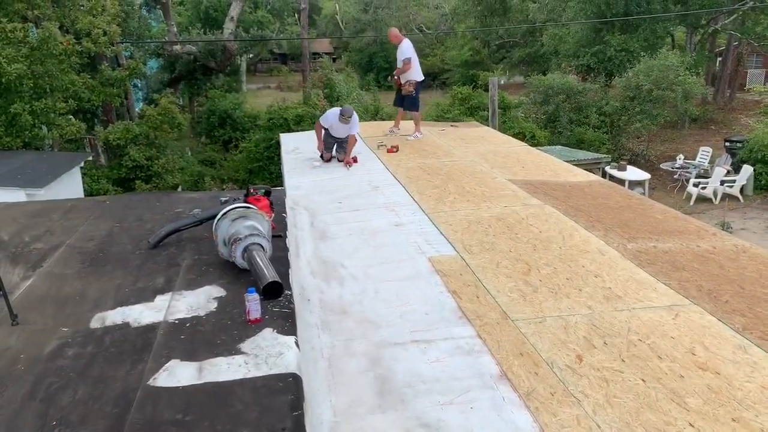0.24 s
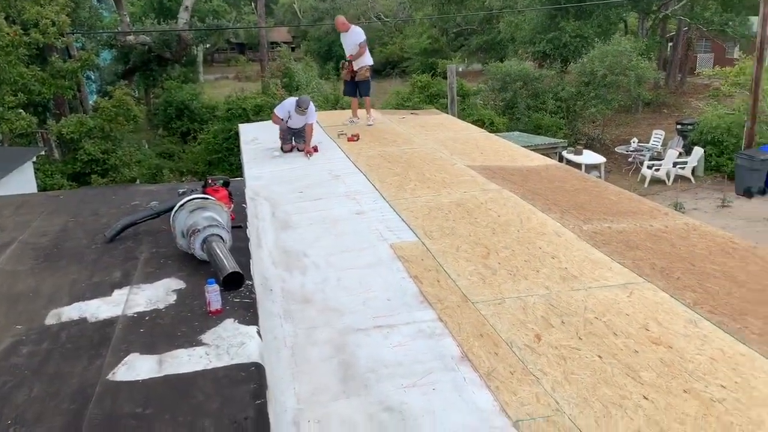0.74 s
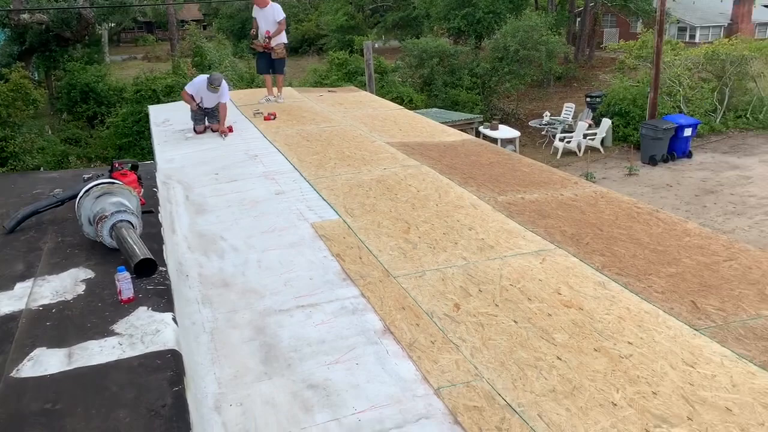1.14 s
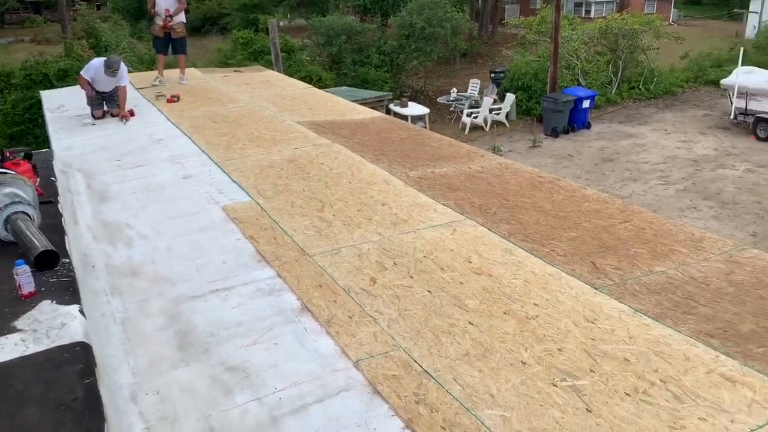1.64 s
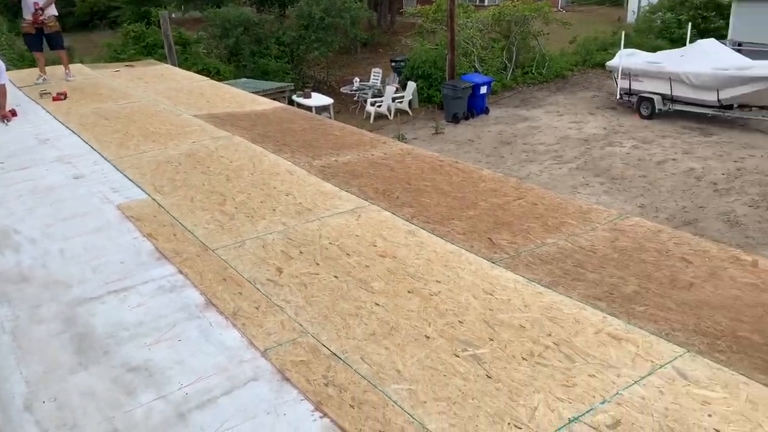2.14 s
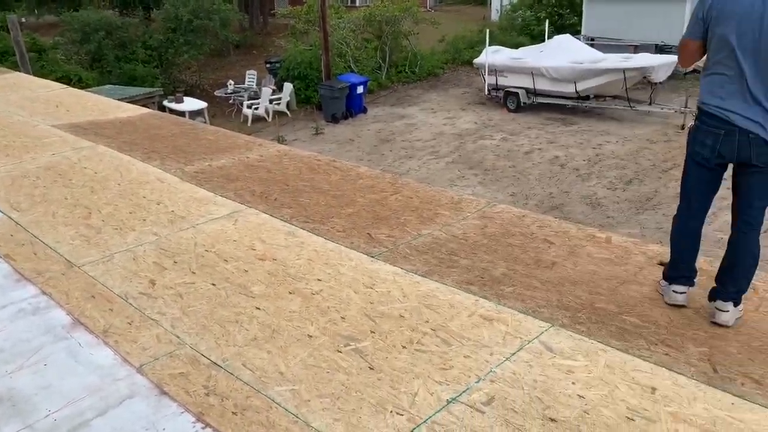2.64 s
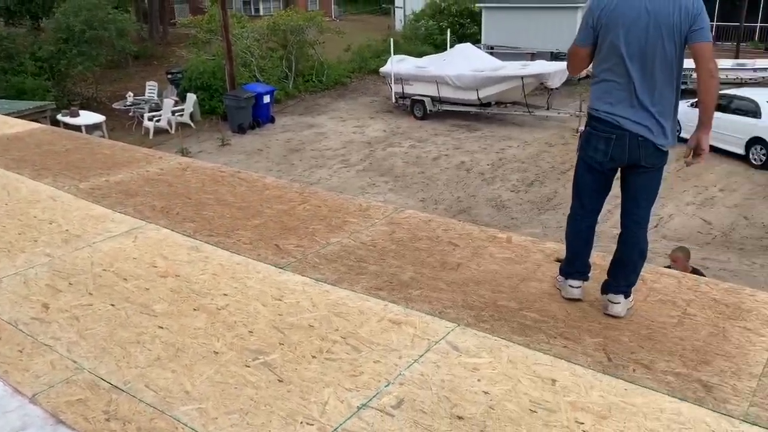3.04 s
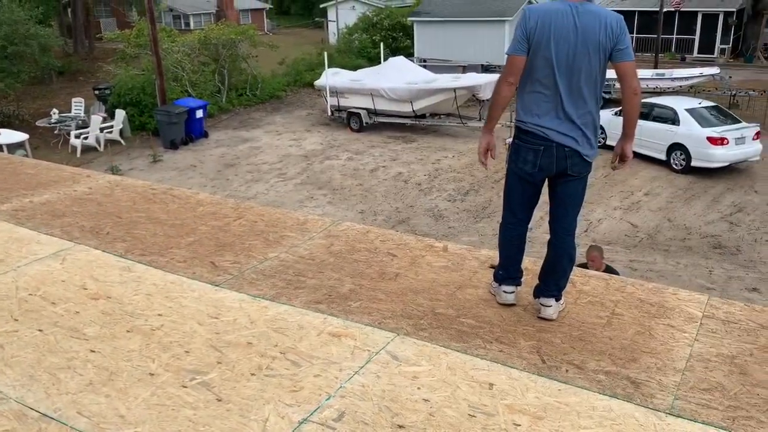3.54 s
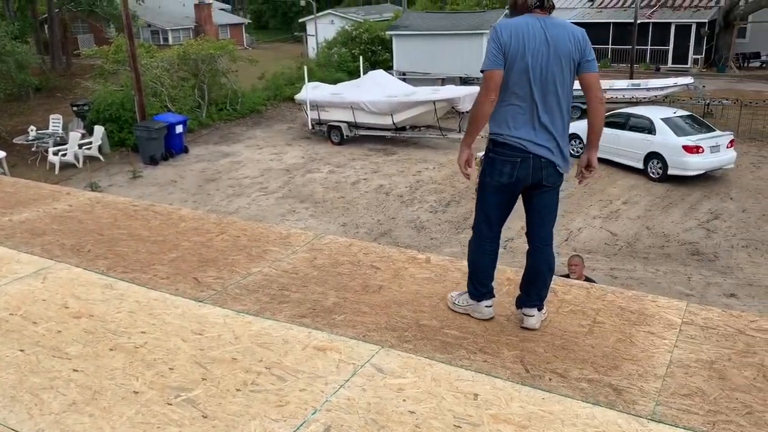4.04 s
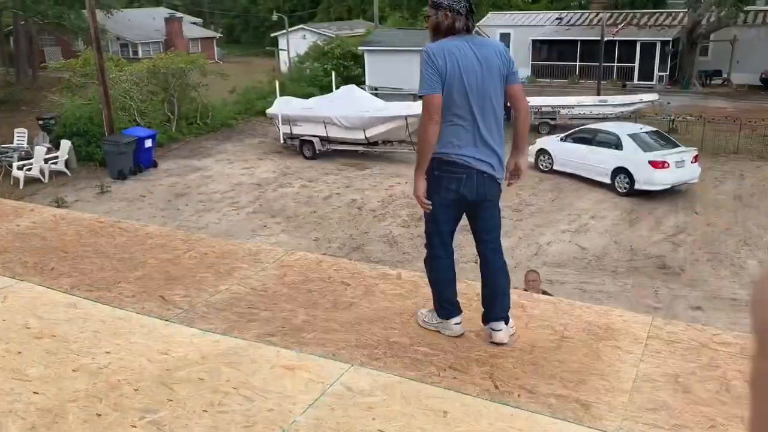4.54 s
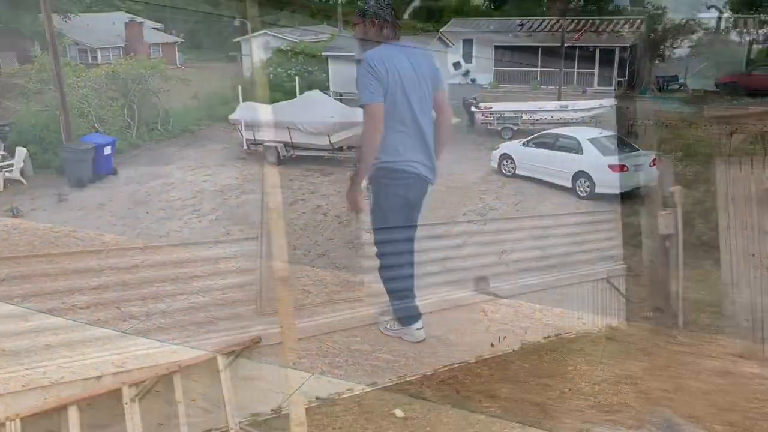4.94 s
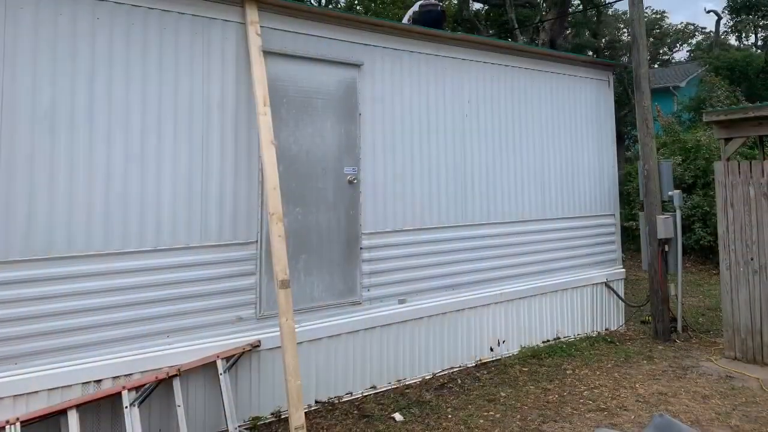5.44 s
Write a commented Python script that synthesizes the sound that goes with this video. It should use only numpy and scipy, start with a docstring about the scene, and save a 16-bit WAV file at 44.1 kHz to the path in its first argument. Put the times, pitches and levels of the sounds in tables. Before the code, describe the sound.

Hard hammer blows crack and thud on a hollow plywood roof deck, first one rhythm, then two, among footsteps, before fading out.

```python
"""Hammering on a roof deck

After one soft, low footfall, hard blows land on wooden roof sheathing in two steady, overlapping rhythms, as of
two people hammering. Each blow is a noise-burst crack through the air, a resonant bending wave whose bass arrives
last, then the ring of the hollow roof. Feet thump and scuff (shaped bursts), boards creak (rough bursts through a
resonance), a sleeve rustles (grainy noise), the yard echoes (decaying noise and slaps), and two faint chirps sound.
Low rumble, breeze and far insects are coloured noise, and all fades out at the end."""
import sys
import numpy as np
from scipy import signal
from scipy.fft import rfft, irfft, next_fast_len
from scipy.io import wavfile
from scipy.ndimage import uniform_filter1d, map_coordinates

SR = 44100
rng = np.random.default_rng(int(sys.argv[2]) if len(sys.argv) > 2 else 0)


def unload_audio(sound):
    """Save the sound as a 16-bit wav file, at the path given as the first command line argument."""
    columns = np.transpose(np.atleast_2d(sound))
    # keep every value between -1 and 1, then stretch to whole-number steps
    steps = np.round(np.clip(columns, -1, 1) * 32767)
    wavfile.write(sys.argv[1], SR, steps.astype(np.int16))


N = 251408

# single sounds are built as spectra on this grid; all source levels stand ahead of the final level curve
SIZE = 32768  # samples
HZ = np.fft.rfftfreq(SIZE, 1 / SR)
AGE = np.arange(SIZE) / SR  # seconds

# a harder contact lifts the treble: (frequency [Hz], share of the hardness [ratio])
HARDNESS_TILT = [(200, 0.23), (900, 0.76), (2300, 0.97)]


def amp(db):
    """Decibels to gain."""
    return 10 ** (np.asarray(db) / 20)


def unit(x):
    """Scaled to rms 1."""
    return x / np.sqrt(np.mean(x ** 2) + 1e-20)


def along(points, hz):
    """Curve through (frequency, value) points on a log frequency axis."""
    f, v = np.transpose(points)
    return np.interp(np.log(hz + 1), np.log(f + 1), v)


def curves(rows):
    """One value per sample for each column after the time."""
    s, *cols = np.transpose(rows)
    return [np.interp(np.arange(N) / SR, s, c) for c in cols]


def wobble(rate):
    """A smooth random curve, rate knots a second."""
    return map_coordinates(rng.standard_normal(int(N * rate / SR) + 4), [np.arange(N) * rate / SR])


def filtered(x, response):
    """x shaped by a response given as a function of frequency."""
    m = next_fast_len(N + SR // 2)
    return irfft(rfft(x, m) * response(np.fft.rfftfreq(m, 1 / SR)), m)[..., :N]


def noise(spectrum, channels):
    """Coloured noise of rms 1."""
    return unit(filtered(rng.standard_normal((channels, N)), lambda hz: amp(along(spectrum, hz))))


def below(corner_hz, order=4):
    """Share of the power that lies under a crossover."""
    return 1 / (1 + (HZ / corner_hz) ** order)


def later(seconds):
    """A pure delay."""
    return np.exp(-2j * np.pi * HZ * seconds)


def mode(centre_hz, width):
    """A damped resonance of gain 1; its width is a share of its frequency."""
    damping = 1j * HZ * centre_hz * width
    return damping / (centre_hz ** 2 - HZ ** 2 + damping)


def bending(travel, rafter_s=0):
    """Bending waves speed up as the root of frequency, so bass comes last; rafters hold it back further."""
    deck_turns = 2 * travel * np.sqrt(200 * HZ)
    rafter_turns = rafter_s * 100 ** 2 / np.maximum(HZ, 35)
    return -1j * np.exp(2j * np.pi * (rafter_turns - deck_turns))


def burst(rise, t60):
    """Spectrum of a noise burst of energy 1."""
    x = rng.standard_normal(SIZE) * (1 - np.exp(-AGE / rise)) * amp(-60 * AGE / t60)
    return rfft(x / np.linalg.norm(x))


def swell(rise_s, fall_s):
    """Spectrum of a noise burst of energy 1 that builds up to time zero and dies away."""
    t = (AGE + .02) % (SIZE / SR) - .02  # the last 20 ms of the grid stand for negative time
    x = rng.standard_normal(SIZE) * np.exp(-np.logaddexp(-t / rise_s, t / fall_s))
    return rfft(x / np.linalg.norm(x))


def tail(t60s, rise, patchy_db):
    """Spectrum of a diffuse, patchy tail of energy 1; each frequency dies at its own speed."""
    hz, t, z = signal.stft(rng.standard_normal(SIZE), SR, nperseg=256)
    t60 = along(t60s, hz)[:, None]
    patches = uniform_filter1d(rng.standard_normal(z.shape), size=3, axis=0)
    patches = unit(uniform_filter1d(patches, size=5, axis=1))
    decay = amp(patchy_db * patches - 60 * t / t60) / np.sqrt(t60)
    x = signal.istft(z * decay, SR, nperseg=256)[1][:SIZE]
    x = x * (1 - np.exp(-(AGE / rise) ** 2))
    return rfft(x / np.linalg.norm(x))


def coarse(spectrum, rough_db, clump_s):
    """The same sound broken into short clumps of random strength, at equal energy."""
    x = irfft(spectrum)
    knots = rng.standard_normal(SIZE // 8)
    lumpy = x * amp(rough_db * map_coordinates(knots, [AGE / clump_s], order=1, mode="wrap"))
    return rfft(lumpy * np.linalg.norm(x) / np.linalg.norm(lumpy))


def peaking(spectrum, db):
    """A sound scaled to a peak level."""
    return amp(db) * spectrum / np.abs(irfft(spectrum)).max()


def ports(s, knock_db=1.5, crack_db=-2.5, bass_hz=255, treble_hz=463):
    """Left and right responses: the right side hears the sound later, by a lag that drifts with time."""
    # (time [s], treble lag of the right side [s], bass lag of the right side [s])
    lags = [(.85, .00021, 0), (2.6, 0.000361, 0), (3.899, 0.00042, 0.00034), (4.23, 0.00039, 0.0028),
            (4.54, .00042, 0.0027), (4.9, 0.00043, 0.0029)]
    times, treble_lags, bass_lags = np.transpose(lags)
    thud = below(bass_hz, order=8) * (1 - below(125, order=6))
    lag = thud * np.interp(s, times, bass_lags) + (1 - below(treble_hz)) * np.interp(s, times, treble_lags)
    # positive decibels lean to the left
    lean = along([(250, 0.0043), (650, knock_db), (1200, 0.0034), (4000, crack_db), (10000, 0.00068)], HZ)
    side = np.array([[1], [-1]])
    return amp(side * lean) * np.exp(1j * np.pi * HZ * lag * side)


def add(track, s, spectrum):
    """Mixes a sound, given as a spectrum, in at time s, with room for what comes just before it."""
    lead = min(1024, max(round(s * SR), 0))
    x = np.roll(irfft(spectrum), lead, axis=-1)
    x = x * np.minimum((np.arange(SIZE) + 1) / (lead / 2 + 1), 1)
    start = max(round(s * SR) - lead, 0)
    track[:, start:start + SIZE] += x[..., :N - start]


def blows():
    """Each contact force drives crack, board knock, bending wave, roof ring and yard echo together."""
    # the first, soft low thud is a footfall, played with the slow hammer's colour; the rest are hammer blows
    # (time [s], whose colour and rhythm, strength [dB], hardness of the contact [dB], metallic tick [dB],
    #  woody knock [dB], pitch of the struck sheet [Hz], travel time through the deck at 200 Hz [s],
    #  extra delay at 100 Hz from crossing rafters [s], echo in the yard [dB],
    #  pitch of the rafter bay [Hz], its knock [dB], ring of the nail in the wood [Hz], its level [dB])
    impacts = [(0.298, "slow", -23.5, -19.5, 3, 7, 724, 0.012, 0.0033, -9.5, 470, 0.5, 1430, -16),
               (0.846, "slow", -16.5, 0, 0, 11, 857, 0.013, 0.0011, -13, 190, -1, 1400, -1),
               (1.274, "slow", -14.5, 0, 1, 3.5, 878, 0.014, 0.0012, -15.5, 480, 1.5, 1420, -21),
               (1.691, "slow", -16, 2.5, -1, 5, 837, 0.012, 0.0012, -19, 450, -15, 1450, -7),
               (2.153, "slow", -18, 0, 12, 9.5, 914, 0.015, .001, -15.5, 280, -7, 3900, 0),
               (2.582, "slow", -15.5, 0.5, 7, 2.5, 791, 0.014, 0.0011, -18.5, 245, -10, 3820, -1.5),
               (3.041, "slow", -18.5, -3, 2, 7.5, 797, 0.014, 0.00071, -15, 380, 9, 1160, -1),
               (3.223, "quick", -20, 6, 3.5, -5, 772, 0.01, 0.0046, -10.5, 290, -3.5, 1930, -18),
               (3.489, "slow", -17, -0.5, -5.5, 2, 890, 0.012, .001, -18.5, 420, 3.5, 2190, -9),
               (3.556, "quick", -19, 2.5, -2, -2.5, 765, 0.0091, 0.0063, -11.5, 280, -1, 2530, -2.5),
               (3.874, "quick", -19, -4, -10.5, 2.5, 843, 0.01, 0.0088, -14.5, 300, -4.5, 2920, -3),
               (4.041, "slow", -20, 4.5, -3, 0.5, 1067, .012, 0.0016, -15.5, 430, -3, 2260, -5),
               (4.225, "quick", -19, -9.5, -1, 7, 766, 0.0069, .015, -14, 275, 0, 2270, -7),
               (4.541, "quick", -21.5, -2.5, -1, 2, 844, 0.0061, 0.022, -16.5, 320, 1, 2550, -2.5),
               (4.872, "quick", -19.5, -2.5, -2, 0.5, 725, 0.0042, 0.024, -12.5, 315, 2.5, 1936, -6.5),
               (4.923, "slow", -21, 19, -15, -10, 960, 0.0071, 0.0095, -24, 434, 2, 2240, 3.5),
               (5.209, "quick", -20, -6, -3.5, -3, 810, 0.0051, 0.015, -16.5, 355, 8.5, 1619, -5),
               (5.357, "slow", -12.5, 10.5, -4.5, -7, 920, .009, 0.011, -22, 350, -13, 2197, -1)]
    # overall colour of a blow as heard, before the pitch shift: (frequency [Hz], level [dB])
    blow_colour = [(30, 35), (60, 40.5), (110, 49), (170, 58), (270, 51.5), (450, 44.5), (750, 42),
                   (1200, 45), (2300, 37), (4500, 39), (7000, 43.5), (8700, 27.5), (10000, 41),
                   (12000, 38.5), (13400, 27.5), (15000, 33.5), (16200, 27)]
    # steel on the nail head lifts the very top: (frequency [Hz], share of the tick [ratio])
    tick_tilt = [(2500, 0.0034), (5500, 0.32), (11000, 0.88)]
    out = np.zeros((2, N))
    for (s, hammer, db, hardness_db, tick_db, knock_db, sheet_hz, travel, rafter_s, echo_db,
         bay_hz, bay_db, nail_hz, nail_db) in impacts:
        # the farther the wave runs through the deck, the lower its thud
        thud_hz = 183.6 * (0.012 / travel) ** 0.25
        shift = (thud_hz / 200) ** below(550)
        force = amp(db + contact(hammer, knock_db, hardness_db) + along(blow_colour, HZ / shift))
        path = bending(travel, rafter_s)
        wave = span_and_bay(thud_hz, bay_hz, bay_db) * path
        near = wave + board(hammer, sheet_hz, travel) + clatter() + crack(hammer) + roof_ring(hammer, path)
        # the metallic tick is heard close by but does not carry into the yard
        near = amp(tick_db * along(tick_tilt, HZ)) * near
        echo = yard(hammer, echo_db, hardness_db)
        add(out, s, force * nail(nail_hz, nail_db) * (ports(s) * near + echo))
    return out


def contact(hammer, knock_db, hardness_db):
    """Colour in dB of one contact: a hard one keeps more treble, a woody one swells the middle."""
    # each hammer's own colour: (frequency [Hz], level [dB])
    hammer_colour = {"slow": [(200, -1.5), (800, -16.5), (2300, -23.5), (5500, -34.5), (11000, -31)],
                     "quick": [(200, -2.2), (800, -10), (2300, -15), (5500, -30), (11000, -39)]}
    # (frequency [Hz], share of the knock level [ratio])
    knock_band = [(330, 0.043), (750, 1), (1300, 0.28), (1900, 0)]
    woody = knock_db * along(knock_band, HZ)
    return along(hammer_colour[hammer], HZ) + woody + hardness_db * along(HARDNESS_TILT, HZ)


def crack(hammer):
    """The wood gives at the impact in a few close contacts, heard straight through the air."""
    # contacts within one blow: (delay [s], level [dB])
    close_contacts = {"slow": [(.0014, -0.5), (.0045, -12), (.0105, -13.5)], "quick": [(.0019, -1),
                      (.0135, -14)]}
    crunch = sum(amp(db) * swell(rise_s=.0008, fall_s=.0015) * later(delay)
                 for delay, db in close_contacts[hammer])
    return amp(-1.0) * np.sqrt(1 - below(1300)) * crunch


def nail(nail_hz, nail_db):
    """The nail rings in the wood in two modes that colour the whole blow."""
    width = 0.17
    upper = amp(-0.5) * mode(1.5 * nail_hz, width)
    return 1 + amp(nail_db) * (mode(nail_hz, width) + upper)


def board(hammer, sheet_hz, travel):
    """The struck sheet's modes speak first: the knock travels only part of the way in the wood."""
    # modes of the sheet: (multiple of the sheet's pitch [ratio], width [share of the mode's pitch], level [dB])
    sheet_modes = {"slow": [(.65, 0.062, 1), (.85, 0.058, 0), (1, 0.04, 4), (1.6, 0.027, 3.5),
                   (2.05, 0.23, -2.5), (2.6, 0.063, 2), (5.8, .06, 0.5)], "quick": [(.76, 0.095, -6),
                   (1, 0.043, 6), (1.25, 0.1, 5), (2.05, 0.052, 1.5), (2.5, 0.1, 3.5), (3.1, 0.04, 2),
                   (4.05, 0.032, 2), (6.4, .05, 3.5)]}
    sheet = 0
    for k, (multiple, width, level) in enumerate(sheet_modes[hammer]):
        gain = amp(level + rng.normal(0, 1.5))
        sheet = sheet + (-1) ** k * gain * mode(multiple * sheet_hz, width)
    return sheet * np.sqrt(1 - below(600, order=8)) * bending(0.2743 * travel) * later(0.000683)


def clatter():
    """A clumpy noise burst in the middle of the spectrum rattles along with the blow."""
    rattle = coarse(burst(rise=0.0015, t60=0.05), rough_db=6, clump_s=.003)
    return amp(-5.5) * np.sqrt(below(3500) * (1 - below(530, order=8))) * rattle


def span_and_bay(thud_hz, bay_hz, bay_db):
    """The span between two rafters rings a few cycles, and the bay under the impact adds a hollow knock."""
    span = amp(-3.5) + amp(-14.0) * mode(1.44 * thud_hz, width=0.27)
    bay = 1 + amp(bay_db) * mode(bay_hz, width=.2)
    return span * bay * np.sqrt(below(385, order=6))


def roof_ring(hammer, path):
    """Waves thrown back by rafters and sheet edges blur into a hollow ring."""
    # colour of the blur: (frequency [Hz], level [dB])
    blur_colour = [(40, 12.5), (60, 7.5), (85, 13.5), (120, 8), (190, -2), (300, 11), (500, 5.5), (900, 5),
                   (2000, -3), (10000, -3.5)]
    # its decay: (frequency [Hz], T60 [s])
    blur_t60 = [(50, 0.18), (130, 0.39), (350, 0.16), (900, 0.25), (2500, .12), (10000, 0.3)]
    # rafter bays: (frequency [Hz], width [share of the frequency], level [dB])
    bay_modes = [(53.7, 0.27, -3), (114.2, 0.026, -6.5), (188.6, 0.054, -7.5), (245.8, 0.065, -11),
                 (355, 0.067, -9), (417.4, 0.047, -8.5)]
    # hammer: ring level [dB]
    ring_db = {"slow": -13, "quick": -13.5}
    bays = 0
    for hz, width, level in bay_modes:
        gain = amp(level + rng.normal(0, 1.5)) * rng.choice([-1, 1])
        bays = bays + gain * mode(hz, width)
    blur = amp(along(blur_colour, HZ) - 2.5) * tail(blur_t60, rise=0.0024, patchy_db=2.5)
    return amp(ring_db[hammer]) * path * (blur + amp(15) * bays) * later(.002)


def yard(hammer, echo_db, hardness_db):
    """Left and right answer of the yard: a grainy, banded wash, a lingering far echo, and slaps off walls."""
    # (frequency [Hz], level [dB])
    echo_colour = [(100, -60), (400, -2.5), (900, -7), (1800, 0), (4500, 9), (7000, 0), (11000, -1.5),
                   (16000, -6)]
    # (frequency [Hz], T60 [s])
    wash_t60 = [(300, 0.17), (2000, 0.42), (4400, 0.28), (7000, .48), (10000, 0.3)]
    # hammer: time before the wash and far echo begin [s]
    echo_delay = {"slow": 0.0044, "quick": 0.016}
    # hammer: time the wash takes to build [s]
    echo_swell = {"slow": .005, "quick": .014}
    # single slaps off walls: (delay [s], level [dB])
    walls = {"slow": [(.026, -16.5), (.09, -23)], "quick": [(.026, -12), (.035, -11.5), (.049, -26),
             (.128, -20)]}
    # bands that linger among far buildings and trees: (frequency [Hz], level [dB])
    far_bands = [(2050, -5.5), (4250, -6)]
    # (frequency [Hz], T60 [s])
    far_t60 = [(2000, 1), (4300, 0.72)]
    wash = np.array([coarse(tail(wash_t60, rise=echo_swell[hammer], patchy_db=2.5), rough_db=3.6, clump_s=.0025)
                     for side in range(2)])
    slaps = sum(amp(db) * swell(rise_s=.0008, fall_s=0.0018) * later(delay) for delay, db in walls[hammer])
    dull_slaps = np.sqrt(below(4000)) * slaps
    # random peaks and dips, one knot every 300 Hz
    bands = amp(1.6 * map_coordinates(rng.standard_normal(SIZE // 64), [HZ / 300]))
    far_colour = sum(amp(db) * mode(hz, width=0.18) ** 2 for hz, db in far_bands)
    far = far_colour * np.array([tail(far_t60, rise=0.034, patchy_db=4.5) for side in range(2)])
    answer = bands * (wash + far) * later(echo_delay[hammer]) + dull_slaps
    # a share of the hardness stays in the direct sound, so the echoes are more alike than the blows
    alike_db = 0.13 * hardness_db * along(HARDNESS_TILT, HZ)
    return amp(echo_db + along(echo_colour, HZ) - alike_db) * answer


def steps():
    """A heel knocks on the board, then the sole loads the span, which booms at its own pitch."""
    # (time [s], thump peak [dB], pitch of the thump [Hz], heel knock peak [dB], pitch of the knock [Hz])
    footfalls = [(.755, -26, 59, -36, 318.5), (0.794, -26.5, 99, -42, 228), (.922, -19, 72.5, -31, 300),
                 (0.997, -25.5, 55, -37.5, 260), (1.02, -22.5, 58, -42, 330), (1.073, -30, 89.5, -45, 253),
                 (1.433, -24, 78, -35, 206), (1.459, -29.5, 61.4, -33, 283), (1.906, -34, 122, -43.5, 267),
                 (2.091, -29, 95, -40.5, 296), (2.214, -29.5, 58, -32.5, 259), (2.272, -29, 88, -33.5, 240),
                 (2.355, -33, 136, -39.5, 287), (2.458, -32.5, 46.3, -43.5, 253),
                 (2.501, -27.5, 77.4, -42, 200), (2.837, -23, 87, -35.5, 397), (2.861, -27, 88, -33.5, 277),
                 (2.943, -27, 105, -39, 193), (4.447, -32.5, 90, -48.5, 250)]
    # a soft sole's push: (frequency [Hz], level [dB])
    sole_colour = [(22, -28.5), (38, 2), (55, 5), (130, 0.5), (220, -4), (450, -24), (1500, -53),
                   (5000, -81.5)]
    # a heel's knock: (frequency [Hz], level [dB])
    heel_colour = [(90, -20), (200, 9.5), (450, -0.5), (700, -16.5), (1400, -17.5), (3500, -43.5),
                   (9000, -60)]
    path = bending(0.014)  # travel time through the deck at 200 Hz, s
    heel_width = 0.2
    out = np.zeros((2, N))
    for s, thump_db, thump_hz, heel_db, heel_hz in footfalls + shuffles():
        # the span keeps moving while the weight rolls over the foot
        roll = 1 + amp(-4) * burst(rise=0.011, t60=0.16)
        thump = amp(along(sole_colour, HZ)) * mode(thump_hz, width=0.7) * roll
        rattle = amp(-7) * burst(rise=.002, t60=0.12)
        knock = mode(heel_hz, heel_width) - amp(-4.0) * mode(1.5 * heel_hz, heel_width)
        heel = amp(along(heel_colour, HZ)) * (knock + rattle)
        footfall = peaking(thump * path, thump_db) + peaking(heel * path, heel_db)
        add(out, s, footfall * ports(s))
    return out


def shuffles():
    """Small shifts of weight: faint footfalls at chance moments, as rows like the footfalls of steps()."""
    per_s, middle_db, spread_db, heel_db = 3.1, -36.5, 2.5, -13.5  # the heel is relative to the thump
    chance = rng.random((int(per_s * N / SR), 3))
    rows = []
    for k, (when, weight, place) in enumerate(chance):
        db = middle_db + spread_db * (2 * weight - 1)
        rows.append(((k + when) / per_s, db, 55 * 2 ** place, db + heel_db, 200 * 2 ** place))
    return rows


def creaks():
    """A loaded or jolted board slips on its nails in rough clumps and groans at one pitch."""
    # (time [s], pitch [Hz], peak level [dB])
    groans = [(2.012, 343, -37), (2.1, 350, -40), (1, 318, -37.5), (2.842, 1400, -49), (4.052, 380, -31)]
    out = np.zeros((2, N))
    for s, hz, db in groans:
        slips = coarse(burst(rise=.01, t60=0.17), rough_db=10.5, clump_s=0.0047)
        add(out, s, peaking(slips * mode(hz, width=0.18) ** 2, db) * ports(s))
    return out


def scuffs():
    """Grit ticks and scrapes on the boards in short noise bursts."""
    # (time [s], level before the lift and colour below [dB])
    scrapes = [(1.0264, -51.5), (1.527, -41), (1.533, -31.5), (1.539, -35.5), (2.678, -45.5), (4.479, -35)]
    # (frequency [Hz], level [dB])
    grit_colour = [(1000, -4.5), (2800, -17), (3800, 5), (7000, -4.5), (11000, 0), (16000, -1.5)]
    out = np.zeros((2, N))
    for s, db in scrapes:
        grit = amp(db + 16.0 + along(grit_colour, HZ)) * burst(rise=0.00038, t60=0.052)
        add(out, s, grit * ports(s))
    return out


def sleeve():
    """Cloth rubs close by in short grainy strokes as an arm passes."""
    # (time [s], level [dB])
    rustle = [(3.7, -81.5), (3.95, -63), (4.15, -64.5), (4.4, -66.5), (4.7, -70.5), (5.15, -70)]
    # (frequency [Hz], level [dB])
    cloth_colour = [(600, -23.5), (1500, -2), (2150, 10), (2700, 2), (3300, 2.5), (3800, 2), (4500, 4),
                    (5300, -5), (6200, -12), (9000, -22.5), (16000, -27.5)]
    strokes_and_grain = amp(2 * wobble(54) + 3 * wobble(440))
    rubbing = unit(strokes_and_grain * noise(cloth_colour, channels=2))
    return amp(curves(rustle)[0]) * rubbing


def bird():
    """Two faint far chirps: a narrow resonance on soft noise, blurred by the trees."""
    # (time [s], pitch [Hz], peak level before the lift below [dB])
    chirps = [(.0, 4030, -64.5), (0.126, 4360, -64)]
    out = np.zeros((2, N))
    for s, hz, db in chirps:
        add(out, s, peaking(mode(hz, width=0.2) ** 2 * burst(rise=0.0205, t60=0.16), db + 5.5))
    return out


def outdoors():
    """Noise in three bands: a low uneven rumble, breeze in the trees and far insects."""
    # (frequency [Hz], level [dB])
    rumble_colour = [(15, -39), (28, -12.5), (40, -0.5), (58, 4.5), (100, -4.5), (160, -13.5), (210, -8.5),
                     (280, -20), (350, -17.5), (550, -31.5), (900, -64)]
    # breeze in the trees: (frequency [Hz], level [dB])
    air_colour = [(240, -22), (400, -3.5), (545, 6.5), (598, -3.5), (814, -0.5), (1930, -9), (2590, -7),
                  (3160, -15), (4440, -21), (5600, -26), (11800, -38), (13300, -44), (16000, -35)]
    # (frequency [Hz], level [dB])
    insect_colour = [(1800, -58), (2350, -7), (2680, -2), (2800, -13.5), (2950, -24), (3500, -55)]
    rumble = amp(-44.5 + 0.24 * wobble(2.3)) * noise(rumble_colour, channels=1)
    air = amp(-58 + 0.16 * wobble(14.0)) * noise(air_colour, channels=2)
    insects = amp(-68 + 2.7 * wobble(40)) * noise(insect_colour, channels=2)
    return rumble + air + insects


def scene():
    """Work on the roof, in the open air."""
    return blows() + steps() + creaks() + scuffs() + sleeve() + bird() + outdoors()


def record(dry):
    """Peaks are rounded off, the sound fades out, and nothing is kept above the band limit."""
    # final level curve; the first level holds until its time: (time [s], level [dB])
    fade = [(4.55, 6.5), (4.85, 0), (5.0, -4.5), (5.2, -8.5), (5.3, -14.5), (5.365, -30), (5.41, -41.5),
            (5.44, -140)]
    top_hz = 16400
    rounded = dry / (1 + np.abs(dry / .95) ** 8) ** (1 / 8)
    return filtered(rounded * amp(curves(fade)[0]), lambda hz: hz < top_hz)


dry = scene()
out = record(dry)
unload_audio(out)
```